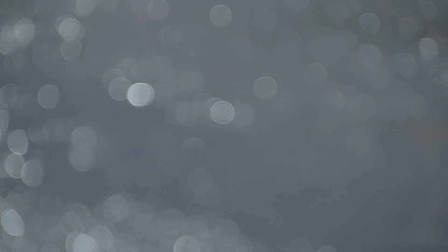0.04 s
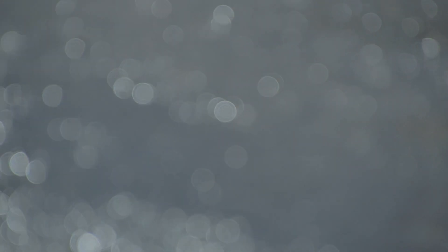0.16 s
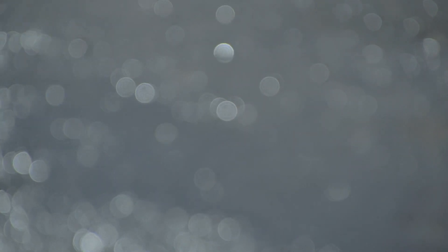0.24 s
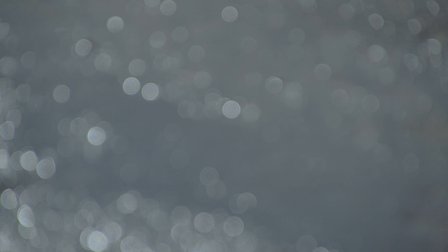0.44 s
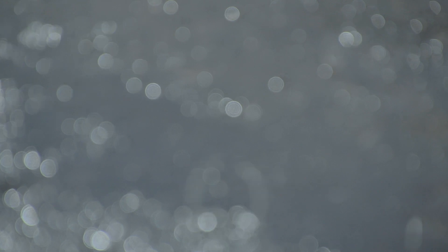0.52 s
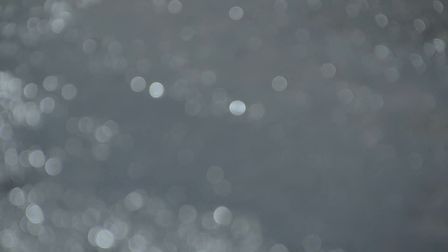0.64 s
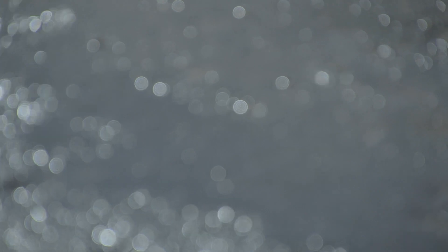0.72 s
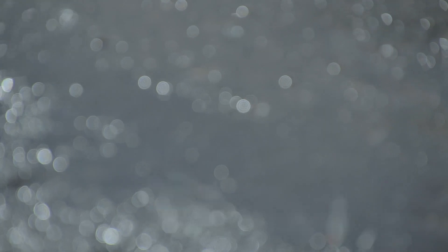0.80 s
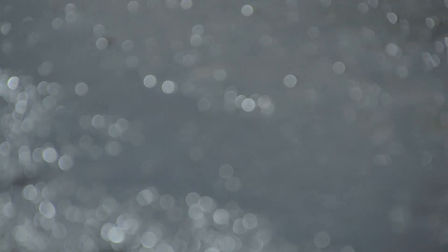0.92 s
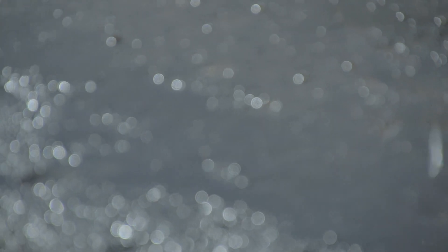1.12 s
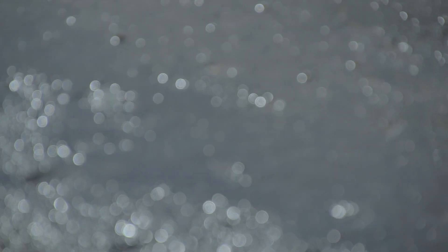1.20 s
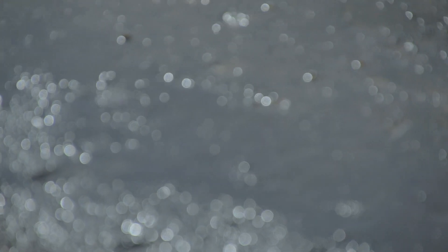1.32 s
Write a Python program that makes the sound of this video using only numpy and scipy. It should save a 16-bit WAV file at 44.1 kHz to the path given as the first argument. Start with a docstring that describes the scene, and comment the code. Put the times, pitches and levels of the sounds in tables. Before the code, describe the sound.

Water dripping on a wet surface, bright plips and hollow plops, a distant bird whistling behind

```python
"""Over a hiss, faint fine dripping and a low rumble strongest early on, meltwater drips onto wet ground.
Splats (noise bursts), plips (gliding tones) and low plops (a ringing hollow) crowd in from the start, with
soft thuds; a far bird whistles, mostly falling (wavering tones, echoed), from about 0.1 to 0.3 s.
Bright plips follow near 0.56 and 0.74 s, the bird returns from about 0.87 s, splats crowd in from 1 s
and a clear plop sounds near 1.16 s. The drops also have a faint echo from the yard."""
import sys
import numpy as np
from scipy import signal
from scipy.fft import rfft, irfft, next_fast_len
from scipy.io import wavfile
from scipy.ndimage import uniform_filter1d, map_coordinates

SR = 44100
rng = np.random.default_rng(int(sys.argv[2]) if len(sys.argv) > 2 else 0)


def pcm_store(signal):
    """Save signal as 16-bit PCM."""
    levels = np.round(np.clip(np.atleast_2d(signal), -1, 1) * 32767)
    wavfile.write(sys.argv[1], SR, levels.astype(np.int16).T)


N = 59535  # length in samples


def amp(db):
    """Turn decibels into a gain."""
    return 10 ** (np.asarray(db) / 20)


def unit(x):
    """Scale to an average (rms) level of 1."""
    return x / np.sqrt(np.mean(x ** 2) + 1e-20)


def along(points, hz):
    """Read a curve of (Hz, value) points, spaced as pitch is heard (log axis)."""
    f, v = np.transpose(points)
    return np.interp(np.log(hz + 1), np.log(f + 1), v)


def wobble(rate, size=N):
    """A smooth random curve with rate random points a second."""
    return map_coordinates(rng.standard_normal(size // 8), [np.arange(size) * rate / SR])


def filtered(x, response):
    """Change each frequency of x by a gain that depends on it."""
    n = x.shape[-1]
    m = next_fast_len(n + 1024, True)
    spectrum = rfft(x, m) * response(np.fft.rfftfreq(m, 1 / SR))
    return irfft(spectrum, m)[..., :n]


def lead(x, seconds):
    """A stereo pair in which the left ear hears x earlier (later if seconds is negative)."""
    sides = np.array([[1], [-1]])
    return filtered(x, lambda hz: np.exp(1j * np.pi * hz * seconds * sides))


def add(out, s, sound, pan_db=0):
    """Mix a sound into the stereo bed at time s; a positive pan_db makes the left louder."""
    i = max(round(s * SR), 0)
    pair = (sound * amp([[pan_db / 2], [-pan_db / 2]]))[:, :N - i]
    out[:, i:i + pair.shape[1]] += pair


def echoes(x, t60, alike=0):
    """Many blurred reflections: a fading noise tail of energy 1, partly alike in the two ears."""
    t = np.arange(min(x.shape[-1], SR // 4)) / SR
    noise = rng.standard_normal((2, len(t))) + alike * rng.standard_normal(len(t))
    tail = noise * amp(-60 * t / t60)
    tail /= np.linalg.norm(tail, axis=1, keepdims=True)
    return signal.fftconvolve(np.atleast_2d(x), tail, axes=1)[:, :x.shape[-1]]


def fade(t, attack, t60):
    """A quick rise and a smooth decay that loses 60 dB in t60 seconds, peak 1."""
    e = (1 - np.exp(-t / attack)) * np.exp(-np.log(1000) * t / t60)
    return e / e.max()


def plips():
    """Each bubble rings briefly and glides, mostly upward as it nears the surface; the ground scatters it."""
    # Bubbles. Each row: start in seconds, starting pitch in Hz, level in dB, attack in seconds,
    # 60 dB decay in seconds, rise in octaves per second, left over right in dB, left lead in seconds.
    bubbles = [(0.0867, 1480, -53, 0.00058, 0.075, 1.5, -18.5, 0),
               (0.0860, 2265, -56, 0.00053, 0.054, -4.5, -16.5, 0),
               (0.1760, 770, -51, 0.002, 0.05, -11.5, 2, -0.0073),
               (0.2060, 1930, -45.5, 0.00095, 0.058, 14.5, -8, .0001),
               (0.2212, 4560, -16.5, 0.00087, 0.0038, 12, 6, .00014),
               (0.2220, 5110, -12, 0.00041, 0.007, 32, 8, 0),
               (0.2218, 14600, -36, 0.00015, 0.0029, 3, 14, 0),
               (0.2231, 5750, -23.5, 0.0012, 0.0098, 19.5, 5.5, .00012),
               (0.2980, 898, -48, 0.0028, 0.05, -8, 6, .0003),
               (0.3000, 2450, -52.5, 0.00036, 0.02, -8, 20, 0),
               (0.3180, 1238, -42.5, 0.0035, 0.046, -1, 12, .0003),
               (0.5358, 1970, -53, .002, 0.0079, -2, 13, 0),
               (0.5540, 2103, -52.5, 0.0027, 0.054, -0.5, 5, 0),
               (0.5624, 3085, -28.5, 0.0009, 0.0053, 2, -9.5, -.00003),
               (0.566, 3330, -28, 0.00018, 0.0076, 40, -7, -.00003),
               (0.6110, 1500, -62, 0.0011, 0.027, 23, -25, 0),
               (0.7370, 840, -51, 0.00057, 0.062, -2, 7.5, .0003),
               (0.7372, 1490, -36.5, 0.00028, 0.011, 6, 3, .0003),
               (0.739, 4090, -24, 0.0014, 0.0053, 78, 8, .00015),
               (0.805, 1570, -50.5, 0.001, 0.011, 35, -18, 0),
               (0.9040, 1205, -57, 0.0024, 0.1, 38, -14.5, 0), (1.1150, 2060, -52, .002, 0.015, 24, -10, 0),
               (1.3088, 2220, -54, .001, 0.025, -9, -15, 0)]
    scatter_db, scatter_t60_s = -4, 0.016  # echo from the nearby ground
    out, t = np.zeros((2, N)), np.arange(SR // 16) / SR
    for s, hz, db, attack, t60, rise, pan_db, lead_s in bubbles:
        pitch = hz * 2 ** np.minimum(rise * t, 1)  # climbs one octave at most
        ring = amp(db) * fade(t, attack, t60) * np.sin(2 * np.pi * np.cumsum(pitch) / SR)
        scatter = amp(scatter_db) * echoes(ring, scatter_t60_s)
        add(out, s, lead(ring, lead_s) + scatter, pan_db)
    return out


def plops():
    """Drops ring a hollow, its pitch and decay changed by where they land; it sinks as the water settles."""
    # Drops on the hollow. Each row: start in seconds, peak level in dB, pitch ratio,
    # left over right in dB, attack in seconds, ring length ratio.
    blows = [(0.1485, -44, 0.82, -14.5, 0.0012, 0.93), (0.1740, -41.5, 0.95, 6, 0.00042, 2.9),
             (0.2262, -19.5, 1.007, 8, 0.00083, 0.97), (0.2975, -40, 1.0, 8, 0.0035, 0.82),
             (0.3178, -37.5, 0.84, 10.5, 0.00069, 0.43), (0.3255, -41.5, .98, 12, 0.0022, 0.86),
             (0.7368, -35, 0.97, 12, 0.00016, 0.26), (1.1570, -19, 0.97, 7.5, 0.00087, 0.85)]
    # Tones of the hollow, before those ratios. Each row: pitch in Hz, relative level in dB,
    # 60 dB decay in seconds.
    tones = [(828, -7.5, 0.064), (1004, -24, 0.081), (1175, 4.5, 0.047), (1255, -2, 0.047),
             (1508, -22, 0.054), (1985, -8.5, 0.013)]
    lead_s = 0.00035  # the ring reaches the left ear first
    sharp, settle_s = 0.092, 0.0083  # the ring starts this share too high, then sinks
    low_hz = 680  # the hollow radiates little below this
    low_cut = signal.butter(2, low_hz, 'high', fs=SR, output='sos')
    out, t = np.zeros((2, N)), np.arange(SR // 16) / SR
    turns = np.cumsum(1 + sharp * np.exp(-t / settle_s)) / SR
    for s, db, ratio, pan_db, attack, length in blows:
        ring = np.zeros(len(t))
        for hz, level, t60 in tones:
            tone = np.sin(2 * np.pi * hz * ratio * turns)
            ring += amp(level) * fade(t, attack, t60 * length) * tone
        ring = signal.sosfilt(low_cut, ring)
        add(out, s, lead(amp(db) * ring / abs(ring).max(), lead_s), pan_db)
    return out


def splats(attack=0.00013, apart=0.54, apart_per_db=0.2, grain_db=3, grain_rate=2500, skirt=0.84):
    """A burst of crackly noise as a drop flattens on the wet surface; off centre the ears differ more."""
    # Bursts. Each row: start in seconds, level in dB (before halving the noise), centre in Hz,
    # spread in octaves, 60 dB decay in seconds, left over right in dB.
    bursts = [(0.0140, -50, 8440, 0.36, 0.088, -5), (0.094, -47, 4330, 0.19, 0.019, 2),
              (0.1125, -47, 5300, 0.13, 0.012, 9.5), (0.1741, -42.5, 1580, 0.2, 0.02, 12),
              (0.2214, -32.5, 5800, 0.95, 0.024, -0.5), (0.2230, -25, 4860, 0.1, 0.064, 2),
              (0.227, -41, 1380, 0.067, 0.032, 12), (0.2937, -35.5, 4400, 0.49, 0.066, 6),
              (0.3165, -39, 7130, 0.26, 0.03, -7.5), (0.449, -43.5, 4860, 0.65, 0.024, -4),
              (0.467, -48, 6800, 0.6, 0.18, 0), (0.5065, -40, 6500, 0.24, 0.026, 3),
              (0.5651, -35.5, 4440, 0.26, 0.044, 0.5), (0.6218, -44, 4600, 0.32, 0.068, -2.5),
              (0.7359, -41, 2050, 0.079, 0.045, 5), (0.738, -35.5, 7500, 4.4, 0.039, -3.5),
              (0.789, -50, 5230, 0.067, 0.026, -19), (1.0125, -31.5, 5330, 1.3, 0.013, 3),
              (1.0138, -37, 7440, 0.18, 0.044, -1), (1.022, -45, 9500, 0.28, 0.13, -4),
              (1.128, -46, 10100, 0.18, 0.009, -14), (1.1451, -32, 7600, 8.1, 0.038, 5),
              (1.1495, -32.5, 11240, 0.1, 0.026, -11), (1.1512, -38, 1740, 0.17, 0.053, 6),
              (1.1568, -33.5, 3460, 0.73, 0.02, 4), (1.2115, -46.5, 8500, 0.39, 0.0073, 0),
              (1.2971, -31, 8240, 0.27, 0.021, -4.5)]
    out, t = np.zeros((2, N)), np.arange(SR // 16) / SR
    for s, db, hz, width, t60, pan_db in bursts:
        shared = rng.standard_normal(len(t))
        own = rng.standard_normal((2, len(t)))  # differs between the ears
        spray = shared + (apart + apart_per_db * abs(pan_db)) * own
        spray = spray * amp(grain_db * wobble(grain_rate, size=len(t)))  # crackle
        spray = unit(filtered(spray, lambda f: (1 + (np.log2((f + 1) / hz) / width) ** 2) ** -skirt))
        add(out, s, amp(db) / 2 * spray * fade(t, attack, t60), pan_db)
    return out


def thuds(attack=0.0013, t60=0.018):
    """Soft, low bumps: deep tones that die away within a few cycles."""
    # Bumps. Each row: start in seconds, level in dB, pitch in Hz.
    bumps = [(0.066, -47, 95), (0.144, -39.5, 130), (0.184, -35.5, 125), (0.249, -42, 149),
             (0.332, -50.5, 89), (0.773, -47, 112)]
    out, t = np.zeros((2, N)), np.arange(SR // 16) / SR
    for s, db, hz in bumps:
        add(out, s, amp(db) * fade(t, attack, t60) * np.sin(2 * np.pi * hz * t))
    return out


def fine_drips(count=480, pan_spread_db=4, rise=15):
    """Many small, faint bubbles at random times make a trickle, each rising in pitch."""
    per_s, level_db, spread_db = 320, -62.5, -1.5
    middle_hz, spread_octaves, decay_cycles = 3434, 0.892, 24
    out, t = np.zeros((2, N)), np.arange(SR // 50) / SR
    times = np.cumsum(rng.exponential(1 / per_s, count))
    for s, (pitch, size, pan) in zip(times, rng.standard_normal((count, 3))):
        if s < N / SR:
            hz = np.clip(middle_hz * 2 ** (spread_octaves * pitch), 900, 14000)
            tone = np.sin(2 * np.pi * hz * t * (1 + rise * t / 2))
            ring = fade(t, 1 / hz, decay_cycles / hz) * tone
            add(out, s, amp(level_db + spread_db * size) * ring, pan_spread_db * pan)
    return out


def bird(flicker_db=3, flicker_rate=130):
    """Mostly falling whistles, wavering in pitch and flickering in level, blurred by distance."""
    # Whistles. Each row: start in seconds, length in seconds, first pitch in Hz, last pitch in Hz,
    # level in dB before the dry and wet gains, waver as a share of the pitch.
    whistles = [(0.129, 0.049, 4630, 4050, -51.5, 0.058), (0.170, 0.0382, 3750, 3256, -47, .06),
                (0.235, 0.0308, 4200, 3414, -43.5, 0.09), (0.265, 0.032, 3544, 3422, -41, .042),
                (0.292, 0.026, 3040, 2890, -44.5, 0.034), (0.865, 0.054, 4334, 3700, -50, 0.081),
                (0.915, 0.064, 3546, 3374, -49.5, .07), (0.968, 0.051, 2450, 2945, -54, 0.071),
                (0.986, 0.034, 3740, 3950, -57, 0.075), (1.179, 0.041, 3650, 2660, -51.5, 0.068)]
    edge_s, waver_rate = 0.006, 560  # fade at each end; random points a second
    dry_db, wet_db, echo_t60_s = -2.5, -1.5, 0.16
    out, t = np.zeros((2, N)), np.arange(SR // 8) / SR
    for s, length, first_hz, last_hz, db, waver in whistles:
        glide = first_hz * (last_hz / first_hz) ** (t / length)
        pitch = glide * (1 + waver * wobble(waver_rate, size=len(t)))
        swell = np.clip(np.minimum(t, length - t) / edge_s, 0, 1)
        swell = swell * amp(flicker_db * wobble(flicker_rate, size=len(t)))
        add(out, s, amp(db) * swell * np.sin(2 * np.pi * np.cumsum(pitch) / SR))
    return amp(dry_db) * out + amp(wet_db) * echoes(out, echo_t60_s, alike=3.4)


def rush(spectrum, alike):
    """Stereo noise of rms 1 with a given colour and likeness of the ears."""
    def turn(hz):
        return np.arccos(np.clip(along(alike, hz), -1, 1)) / 2

    def colour(hz):
        return amp(along(spectrum, hz)) * [np.cos(turn(hz)), np.sin(turn(hz))]

    # mid is shared by the ears, side is opposite in them
    mid, side = filtered(rng.standard_normal((2, N)), colour)
    return unit(np.array([mid + side, mid - side]))


def patchy(x, depth_db):
    """Random patches of gain, about a thousand Hz wide and some tens of ms long."""
    z = signal.stft(x, nperseg=512)[2]
    field = uniform_filter1d(rng.standard_normal(z.shape[1:]), size=12, axis=0)  # across pitch
    field = uniform_filter1d(field, size=7, axis=1)  # along time
    return unit(signal.istft(z * amp(depth_db * unit(field)), nperseg=512)[1][:, :N])


def air():
    """Outdoor air as coloured noise: a patchy hiss, and a low rumble that rises and falls."""
    # Colour of the hiss. Each row: frequency in Hz, relative level in dB per Hz.
    hiss_colour = [(150, -29), (250, -2.5), (700, -0.5), (1700, -2.5), (2500, -3.5), (4000, -2), (7000, -5),
                   (10000, -10.5), (16000, -17)]
    # Likeness of the ears in the hiss. Each row: frequency in Hz, likeness (1 is the same).
    hiss_alike = [(200, 0.82), (1500, 0.34), (5000, 0.14), (15000, 0.47)]
    # Colour of the rumble. Each row: frequency in Hz, relative level in dB per Hz.
    rumble_colour = [(15, -36), (28, -2.5), (60, -2.5), (110, -3), (200, -8.5), (350, -15), (700, -32)]
    # Likeness of the ears in the rumble. Each row: frequency in Hz, likeness (1 is the same).
    rumble_alike = [(60, 1), (150, 0.76), (350, 0.28)]
    # Loudness of the rumble. Each row: time in seconds, level in dB.
    rumble_level = [(0, -53.5), (0.041, -62.5), (0.081, -57.5), (.125, -60), (0.149, -47.5), (.19, -53.5),
                    (.23, -48), (.29, -62.5), (.34, -59.5), (.42, -62.5), (.6, -61), (.78, -62.5),
                    (.93, -63), (1.2, -59.5), (1.28, -62.5), (1.35, -62.5)]
    hiss_db = -57
    rumble_db = np.interp(np.arange(N) / SR, *np.transpose(rumble_level))
    hiss = amp(hiss_db) * patchy(rush(hiss_colour, hiss_alike), depth_db=3.0)
    return hiss + amp(rumble_db) * rush(rumble_colour, rumble_alike)


def scene():
    """Near drops with a faint echo from the yard, over the background."""
    yard_db, yard_t60_s = -24.5, 0.2
    drops = plips() + plops() + splats()
    yard = amp(yard_db) * echoes(drops, yard_t60_s)
    return drops + yard + thuds() + fine_drips() + bird() + air()


def record(dry):
    """Keep nothing at or above the band limit."""
    top_hz = 16100
    return filtered(dry, lambda hz: hz < top_hz)


dry = scene()
out = record(dry)
pcm_store(out)
```